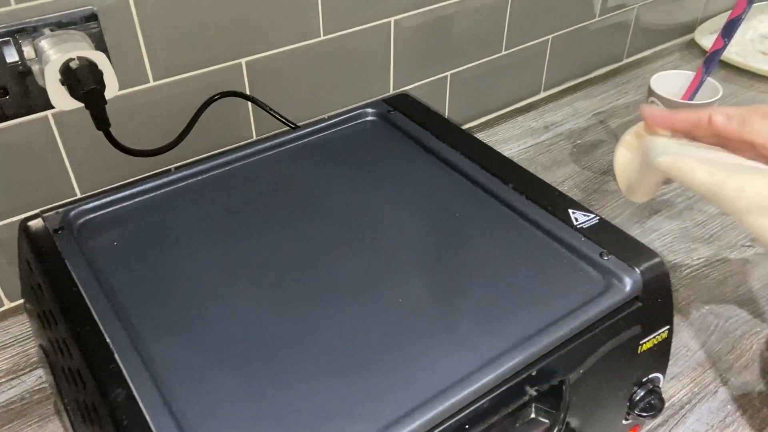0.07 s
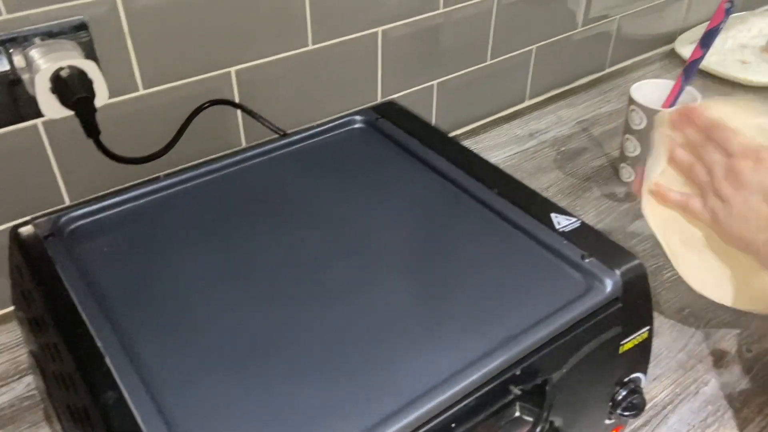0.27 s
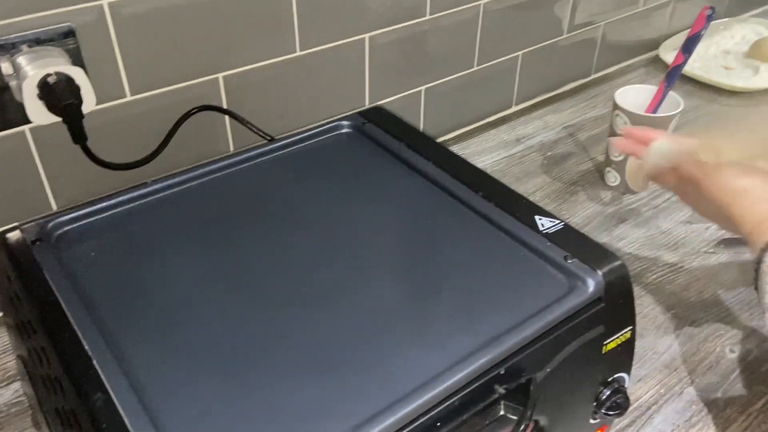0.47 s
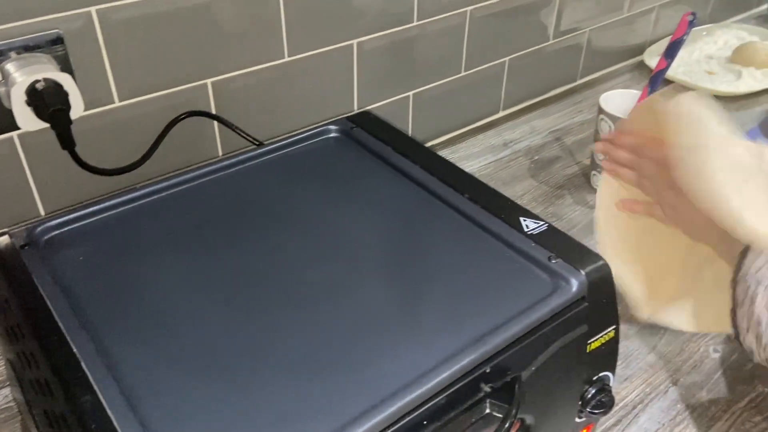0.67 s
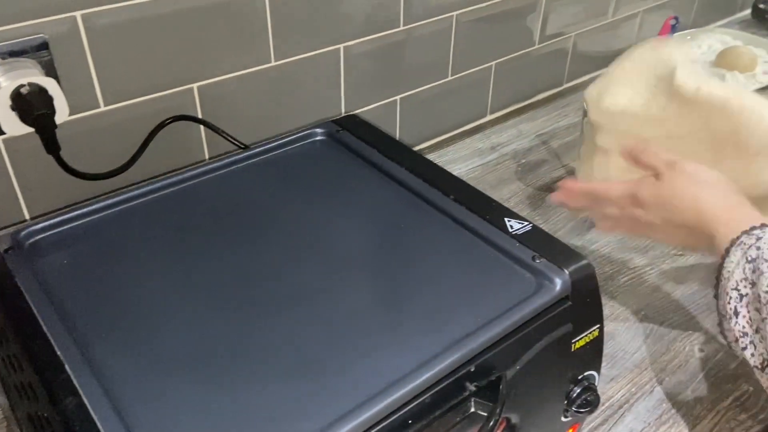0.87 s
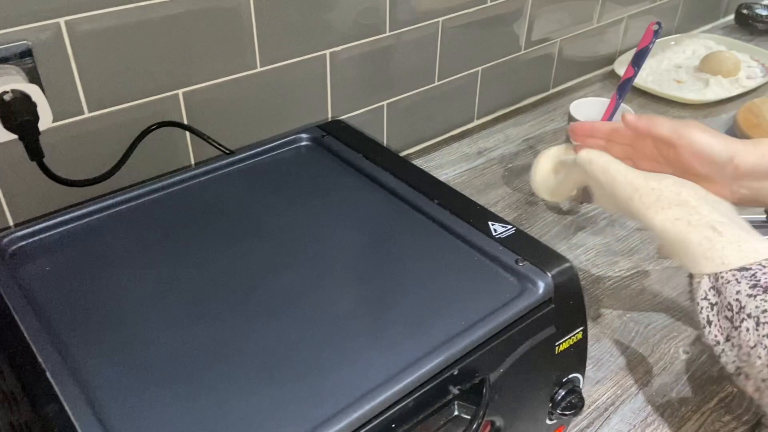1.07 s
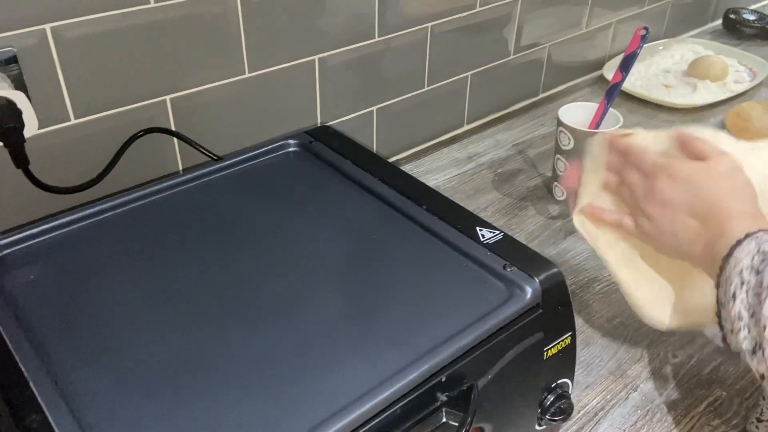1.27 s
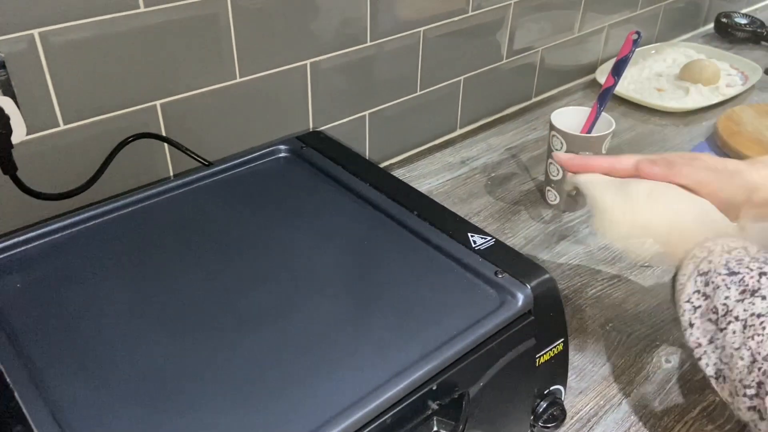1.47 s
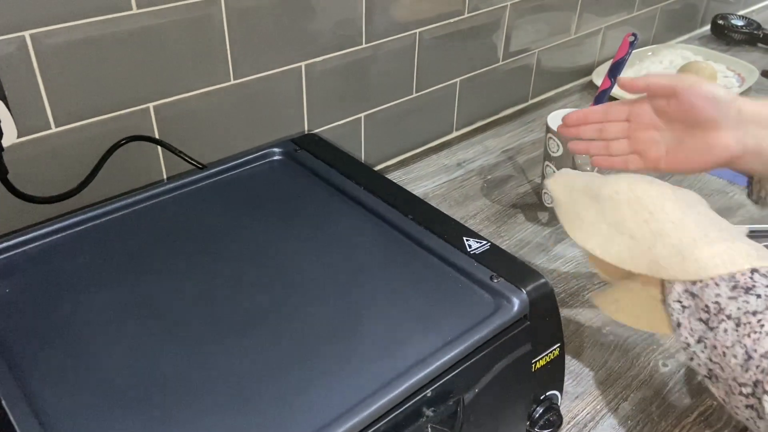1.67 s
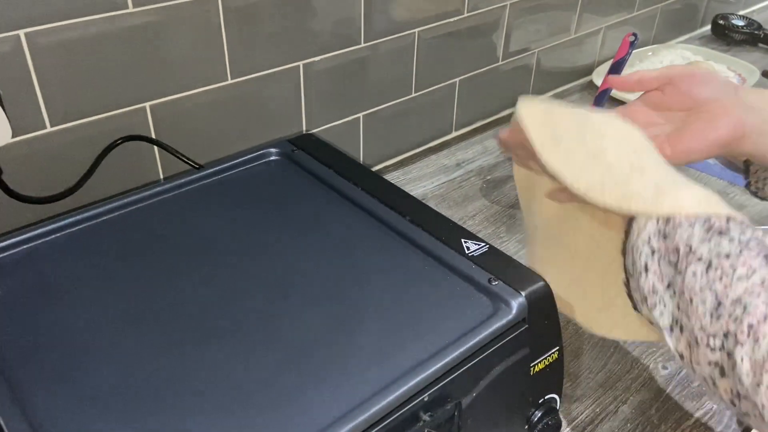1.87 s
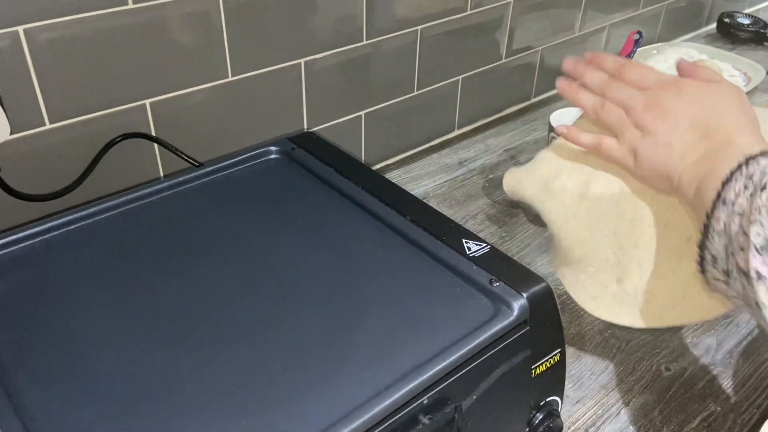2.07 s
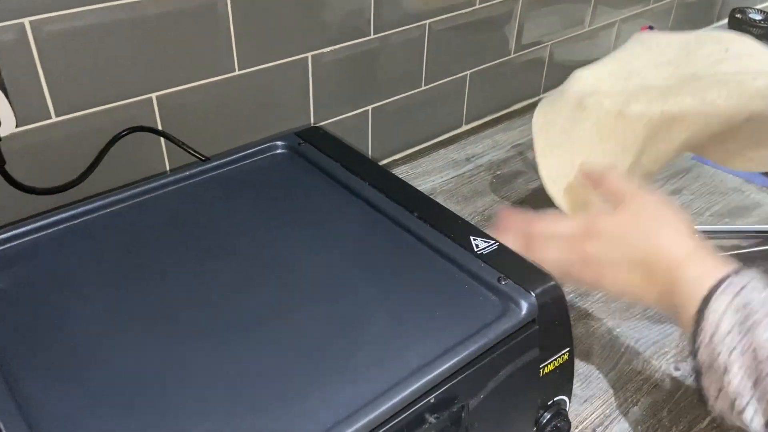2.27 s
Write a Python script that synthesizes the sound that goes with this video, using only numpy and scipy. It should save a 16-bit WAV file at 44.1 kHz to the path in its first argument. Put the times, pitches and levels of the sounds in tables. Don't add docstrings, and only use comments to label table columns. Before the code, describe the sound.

Hands slap a disc of soft dough back and forth, about four catches a second, one much louder early on, then softer pats, a longer gap and a last catch; close stereo microphone, tiled kitchen, low fridge hum.

```python
import sys
import numpy as np
from scipy import signal
from scipy.fft import rfft, irfft, next_fast_len
from scipy.io import wavfile
from scipy.ndimage import uniform_filter1d

SR = 44100
rng = np.random.default_rng(int(sys.argv[2]) if len(sys.argv) > 2 else 0)


def volts(x):
    e = np.asarray(x, float) / 20
    return 10 ** e


def waveform_to_disk(signal):
    frames = np.transpose(np.atleast_2d(signal))
    scaled = np.clip(frames, -1, 1) * 32767
    samples = np.round(scaled).astype(np.int16)
    wavfile.write(sys.argv[1], SR, samples)


N = 101429
PAD = SR // 10
SPAN = 2048


def level(x, db):
    return x * volts(db) / np.sqrt(np.mean(x ** 2))


def gains(table, size, col=1):
    t = np.array(table, float)
    hz = np.arange(size // 2 + 1) * SR / size
    return np.interp(np.log(hz + 1), np.log(t[:, 0]), t[:, col])


def colour(x, table):
    cepstrum = irfft(gains(table, size=1024) * np.log(10) / 20)
    cepstrum[1:512] *= 2
    cepstrum[513:] = 0
    response = irfft(np.exp(rfft(cepstrum)))
    return signal.fftconvolve(x, response)[:x.shape[-1]]


def ring(x, hz, width_hz):
    return signal.lfilter(*signal.iirpeak(hz, hz / width_hz, fs=SR), x)


def add(track, s, piece):
    i = max(int(s * SR) + PAD, 0)
    track[i:i + len(piece)] += piece[:len(track) - i]


# start in seconds, level in dB, pitch of the air pocket in Hz,
# pocket in dB and thump in dB, both compared with the level.
CATCHES = [
    (-.035, -18.5, 1720, -8, -6.5),
    (.2226, -22.5, 1248, 0, -2),
    (.4285, -12, 1880, -3, -4),
    (.6895, -27.5, 1670, -5.5, -3),
    (.9012, -18.5, 1210, 3, -3),
    (1.188, -27.5, 1225, 3, -4.5),
    (1.423, -28, 1389, 2.5, 2.5),
    (2.007, -25.5, 2610, -10, 1.5),
]
TOUCHES = [(.200, -30.5, 3300, -3.5, -35), (.206, -33.5, 2830, 3.5, 4.5), (.213, -48, 1500, 10, -11.5),
           (.420, -50, 1650, 22, -17), (.676, -47, 2210, 10, 8), (.681, -34, 2800, -3.5, -1),
           (.8955, -37.5, 1480, 4, 7), (1.157, -42, 2840, -19.5, 2.5), (1.166, -42.5, 2000, -3.5, -10),
           (1.180, -43, 1400, 10, -14), (1.417, -54.5, 1700, 21, 6), (1.963, -69.5, 1520, 10, -8),
           (1.993, -49, 2760, -4, -13), (2.001, -47, 1780, 11.5, -5), (2.0045, -41, 1626, 7.5, -33),
           (.432, -26.5, 3520, 4, 3), (.431, -25.5, 1286, 7, -14.5), (.904, -41.5, 3900, 9, -33.5),
           (1.190, -50.5, 4250, 11, -12)]
# frequency in Hz, gain in dB.
SKIN = [(100, -29), (500, -3), (1300, -1), (2700, -1.5), (4200, -6.5), (5300, -14.5), (8000, -15),
        (16000, -24.5)]
CATCH_S, TOUCH_S = 0.0046, 0.0046
RISE_S, FALL_S = 0.0012, 0.0035
POCKET_SHARE, BLURRED_SHARE = 0.3, 0.8
THUMP_HZ, THUMP_LATE_S, THUMP_S = 365.3, 0.0018, 0.0024


def strike(skin, pocket, row, share):
    s, db, hz, pocket_db, thump_db = row
    pop = ring(ring(pocket, hz, hz * share), hz, hz * share)
    return level(colour(skin, SKIN), db) + level(pop, db + pocket_db)


def contacts(rows, spread):
    t = np.arange(SPAN) / SR
    crack, push, mid, side = np.zeros((4, N + PAD))
    chance = rng.standard_normal((len(rows), 3, SPAN))
    tails = kitchen()
    shape = (1 - np.exp(-t / RISE_S)) * np.exp(-np.maximum(t - spread, 0) / FALL_S)
    energy = np.sqrt(spread * SR / SPAN)
    tick = 1. * (t == 0)
    for row, (fine, size, air) in zip(rows, chance):
        s, db, hz, pocket_db, thump_db = row
        clicks = fine * volts(3 * np.sqrt(16) * uniform_filter1d(size, size=16)) * shape
        puff = air * shape * np.exp(-t / spread / 2)
        add(crack, s, energy * strike(clicks, puff, row, POCKET_SHARE))
        swell = t / THUMP_S * np.exp(1 - t / THUMP_S)
        thump = volts(db + thump_db) * np.sin(2 * np.pi * THUMP_HZ * t) * swell
        add(push, s + THUMP_LATE_S, thump)
        into_room = energy * strike(tick, tick, row, BLURRED_SHARE) + thump
        tail = signal.fftconvolve(into_room[None], tails(), axes=1)
        add(mid, s, tail[0])
        add(side, s, tail[1])
    return np.array([crack, push, mid, side])


# start in seconds, level in dB.
KNOCKS = [
    (0.437, -29),
    (1.2, -30),
    (1.577, -42.5),
]
# pitch in Hz, level in dB, seconds to fade by 60 dB.
BOOMS = [(116.4, -13, 0.31), (155, -11, 0.18), (195, -6.5, 0.13), (259, -9, 0.37), (373.3, -26, .08)]


def booms(push):
    t = np.arange(SR // 2) / SR
    kick = push.copy()
    for s, db in KNOCKS:
        add(kick, s, volts(db) * np.hanning(200) * np.sin(2 * np.pi * 200 * t[:200]))
    body = sum(volts(db) * np.sin(2 * np.pi * hz * t) * volts(-60 * t / t60) for hz, db, t60 in BOOMS)
    low = signal.fftconvolve(np.abs(kick), body)[:len(kick)] / 40
    return kick + signal.sosfilt(signal.butter(2, 75, "high", fs=SR, output="sos"), low)


# level in dB, length in seconds.
BRUSHES = [(-53, 0.05), (-41, 0.012), (-70, 0.26), (-50, 0.059), (-55, .041), (-52.5, 0.031), (-47, 0.042),
           (-50.5, 0.024), (-62.5, 0.05), (-68.5, 0.21), (-48.5, .025), (-38.5, 0.014)]
BRUSH_MIDDLES = [.045, .311, .56, .772, 1.05, 1.172, 1.292, 1.478, 1.53, 1.70, .670, .898]
# frequency in Hz, gain in dB.
FLOUR = [(300, -10.5), (1500, -2.5), (4000, -3), (8000, -5.5), (16000, -6)]


def brushes():
    out = np.zeros(N + PAD)
    t = np.arange(SPAN * 6) / SR
    hisses = rng.standard_normal((len(BRUSHES), len(t)))
    for s, (db, length), hiss in zip(BRUSH_MIDDLES, BRUSHES, hisses):
        swell = np.sin(np.pi * np.clip(t / length, 0, 1)) ** 2
        add(out, s - length / 2, level(colour(hiss, FLOUR), db) * swell)
    return out


# frequency in Hz, gain in dB.
WORKTOP_SIDE = [(100, -23.5), (300, -16), (600, 2.5), (1300, -0.5), (2400, -6.5), (4400, -11), (7000, -14),
                (15000, -20.5)]


def worktop(near):
    t = np.arange(160) / SR
    echo = rng.standard_normal(len(t)) * np.hanning(len(t))
    echoes = signal.fftconvolve(near, echo / np.linalg.norm(echo))[:N + PAD]
    return colour(echoes, WORKTOP_SIDE)


# band centre in Hz, seconds to fade by 60 dB, level in dB,
# side level against the middle in dB.
ROOM = [(135, 0.35, 20.5, -12), (231, 0.17, -3, -40), (480, 0.41, 8, -6), (930, 0.45, -1.5, 2),
        (2000, 0.48, -3.5, -4), (4260, 0.43, -1.5, -4.5), (8300, 0.5, -5, -15.5), (13580, .35, -1, -27)]
ROOM_DB, ROOM_LATE_S = -5.5, 0.0034


def kitchen():
    size = 32768
    t = np.arange(size) / SR
    noise = rfft(rng.standard_normal((2, size)))
    octave = np.log2(np.arange(size // 2 + 1) * SR / size + 1)
    bands, fades = [], []
    for hz, t60, db, side_db in ROOM:
        bands.append(irfft(noise * np.clip(1 - np.abs(octave - np.log2(hz)), 0, 1)))
        fade = volts(-60 * t / t60 + db + ROOM_DB) / np.sqrt(t60 * SR / 14)
        fades.append(fade * volts(np.array([[0], [side_db]])))
    bands = np.array(bands)
    fades = np.array(fades) * (1 - np.exp(-(t / ROOM_LATE_S) ** 2))
    return lambda: np.sum(np.roll(bands, rng.integers(size), axis=2) * fades, axis=0)


# pitch in Hz, width in Hz, level in dB.
FRIDGE = [(49.2, 10, -55), (68.9, 8.6, -61.5), (217.8, 19, -64.5), (254, 30, -65), (424.6, 17, -59.5),
          (560, 10, -87), (1500, 10, -77)]
# frequency in Hz, gain in dB.
AIR = [(18, -50.5), (30, -11.5), (364, -8), (415, -10.5), (486, -23), (540, -9.5), (684, -16), (1540, -30),
       (16000, -50.5)]
# frequency in Hz, side against the middle in dB.
AIR_SIDE = [(60, -21), (200, -12.5), (700, -6.5), (1300, -3.5), (2400, -8.5), (4400, -2), (7000, -9),
            (15000, -23.5)]
AIR_DB = -54


def floor():
    size = next_fast_len(N + PAD)
    noise = rfft(rng.standard_normal((2, size))) * volts(gains(AIR, size))
    width = [np.ones(size // 2 + 1), volts(gains(AIR_SIDE, size))]
    mid, side = irfft(noise * width, size)[:, :N + PAD]
    hum = np.zeros(N + PAD)
    for hz, width_hz, db in FRIDGE:
        waver = np.sign(ring(rng.standard_normal(N + PAD), hz, width_hz))
        hum += level(ring(waver, hz, 2 * width_hz), db)
    g = volts(AIR_DB - 10) / np.std(mid)
    return np.array([mid * g + hum, side * g + colour(np.roll(hum, PAD), AIR_SIDE)])


def scene():
    crack, push, mid, side = contacts(CATCHES, CATCH_S) + contacts(TOUCHES, TOUCH_S)
    flour = brushes()
    near = crack + flour + booms(push)
    flour_tail = signal.fftconvolve(flour[None], kitchen()(), axes=1)[:, :N + PAD]
    mid, side = np.array([mid, side]) + floor() + flour_tail
    side = side + worktop(near)
    return np.array([near + mid + side, near + mid - side])[:, PAD:]


# frequency in Hz, difference in dB.
LEFT = [(250, 0), (500, -1.5), (1000, 0.5), (4000, 1), (7000, 1)]


def ports(dry):
    lag_s, lag_hz = .000233, 6950
    size = next_fast_len(N + SPAN)
    hz = np.arange(size // 2 + 1) * SR / size
    late = np.exp(-2j * np.pi * lag_s * np.maximum(hz - lag_hz, 0))
    tilt = volts(gains(LEFT, size) / 2)
    return irfft(rfft(dry, size) * [late * tilt, 1 / tilt], size)[:, :N]


def low_pass(x):
    return signal.sosfilt(signal.butter(12, 16660, fs=SR, output="sos"), x)


def record(dry):
    limit = 1.3
    x = ports(dry)
    x = signal.sosfilt(signal.butter(4, 42, "high", fs=SR, output="sos"), x)
    x = limit * np.tanh(x / limit)
    x = signal.sosfilt(signal.ellip(8, .2, 60, 16300, fs=SR, output="sos"), x)
    return low_pass(x)


dry = scene()
out = record(dry)
waveform_to_disk(out)
```